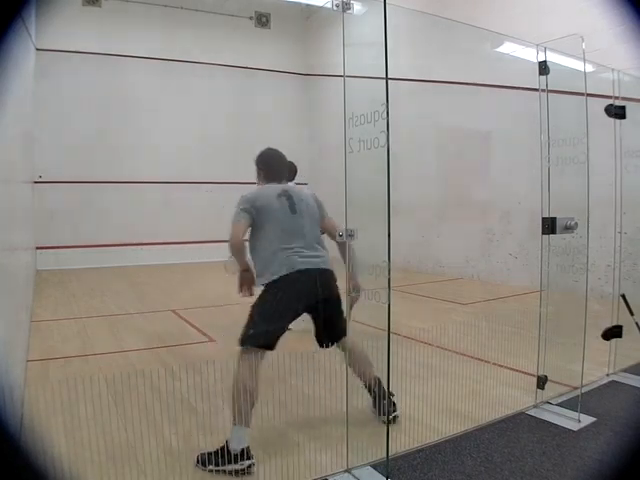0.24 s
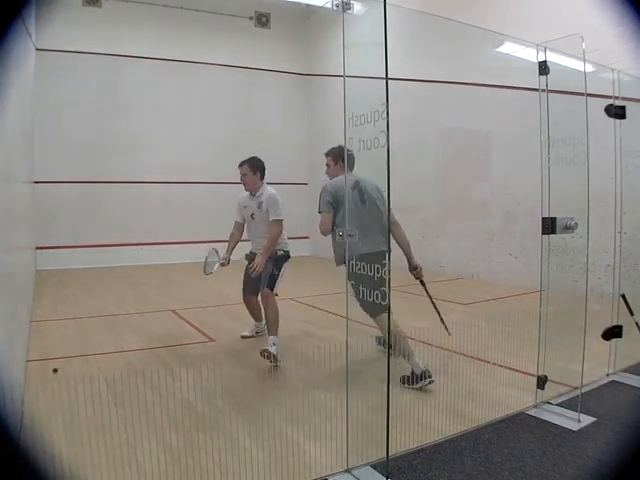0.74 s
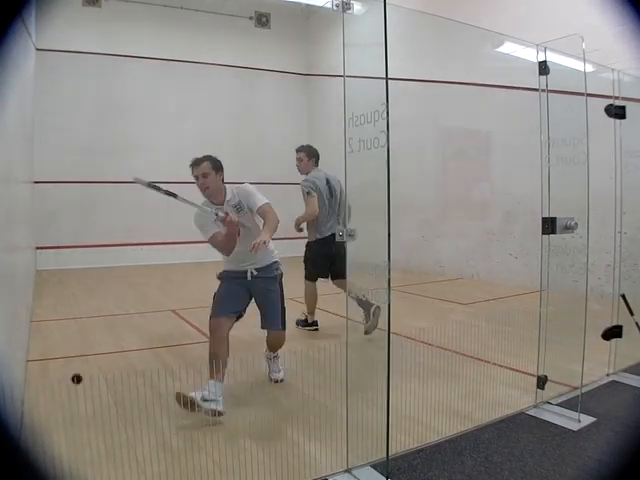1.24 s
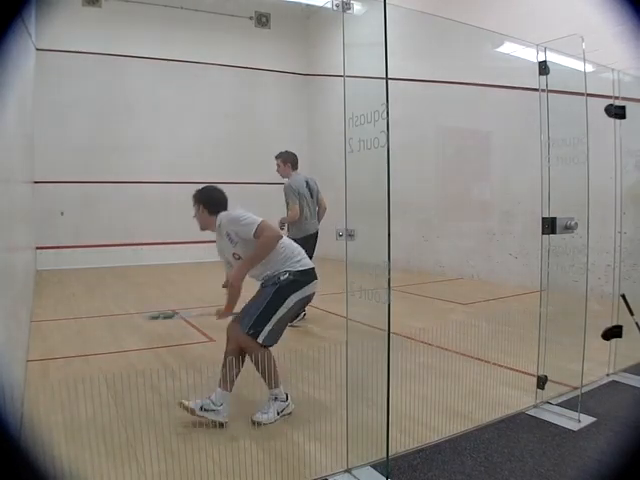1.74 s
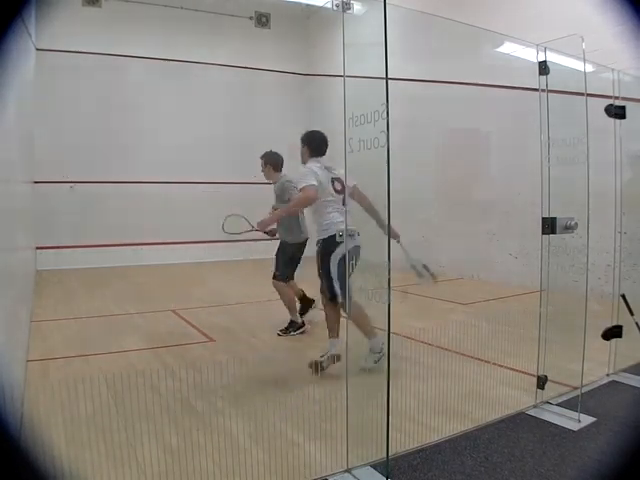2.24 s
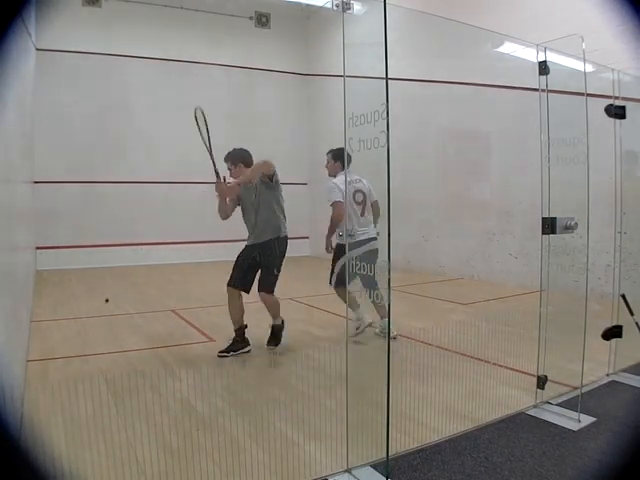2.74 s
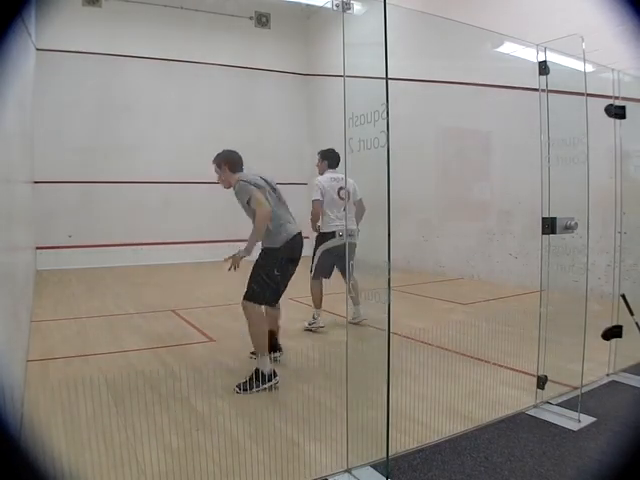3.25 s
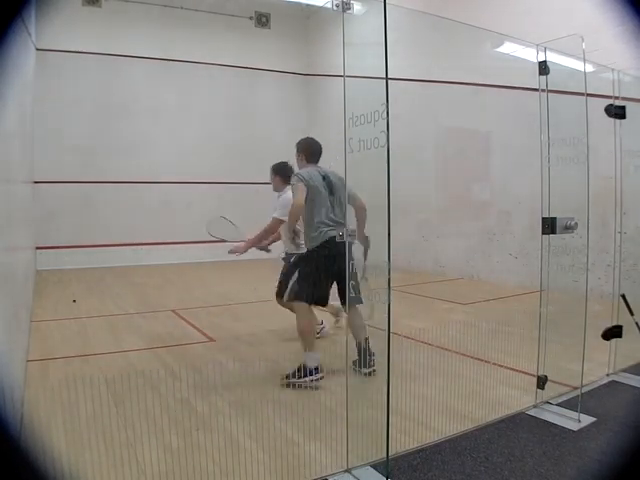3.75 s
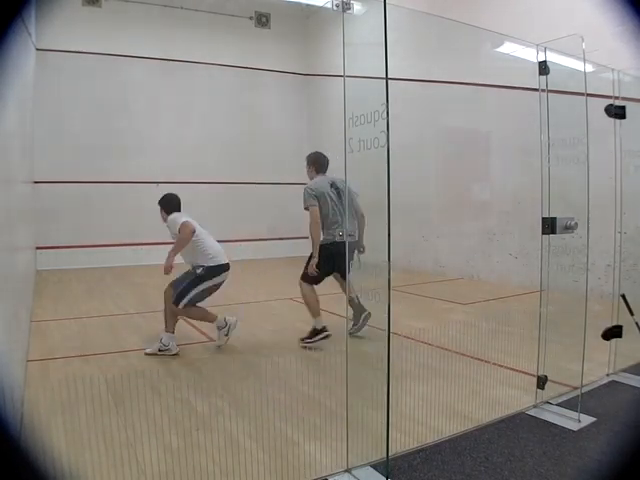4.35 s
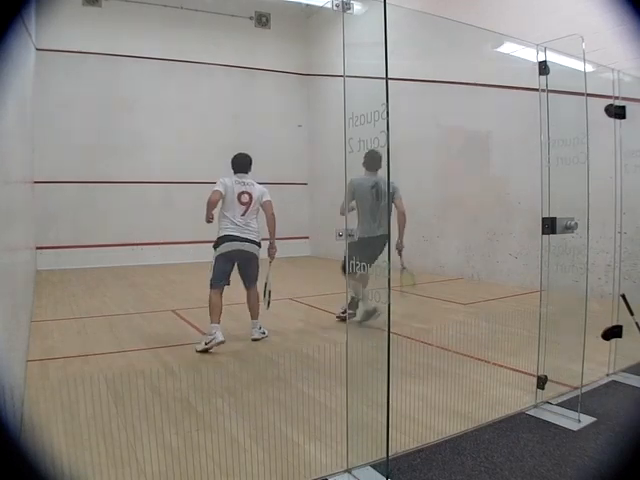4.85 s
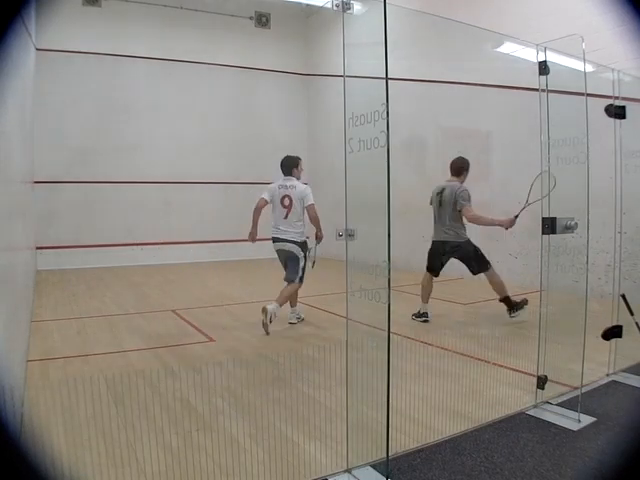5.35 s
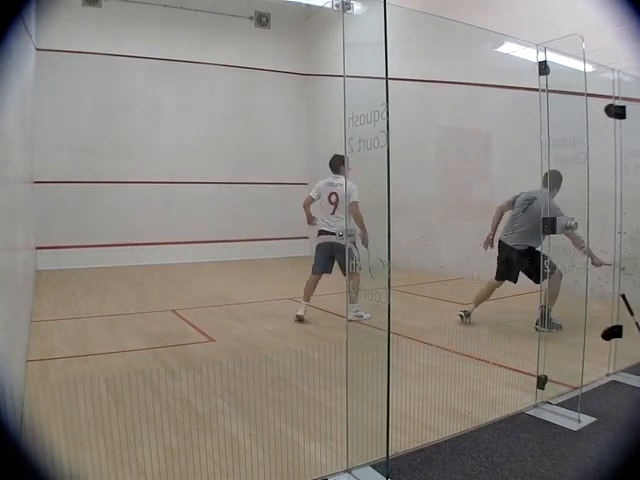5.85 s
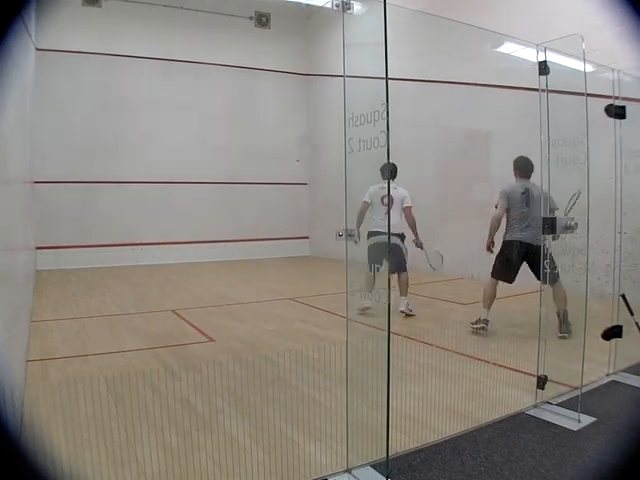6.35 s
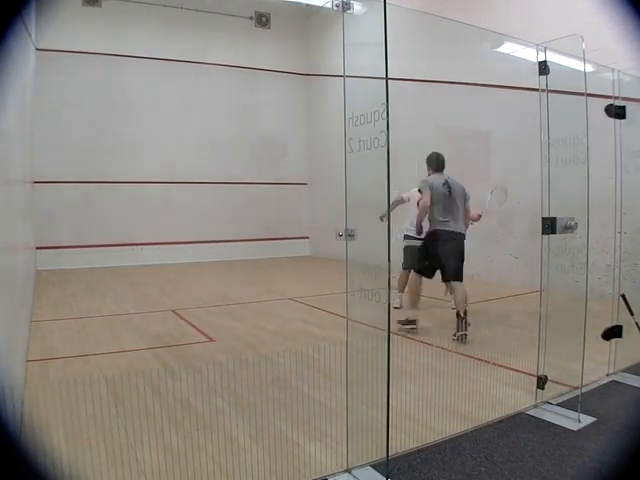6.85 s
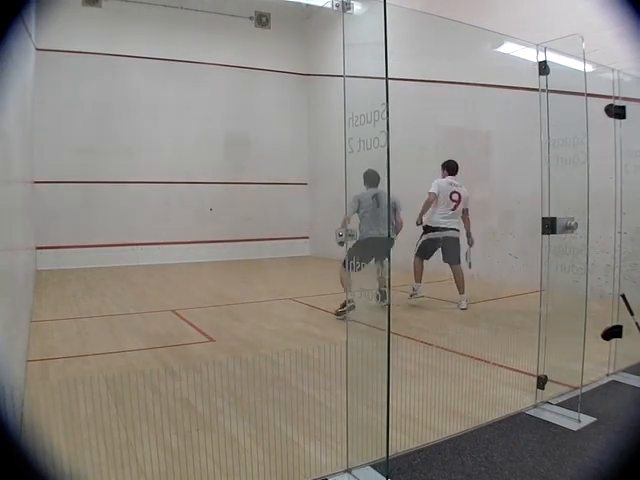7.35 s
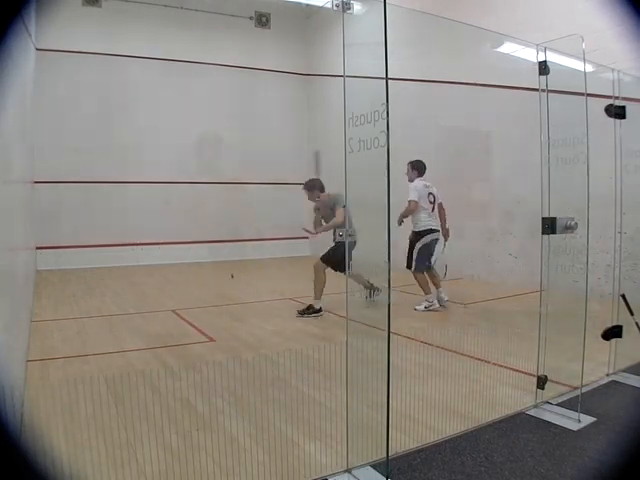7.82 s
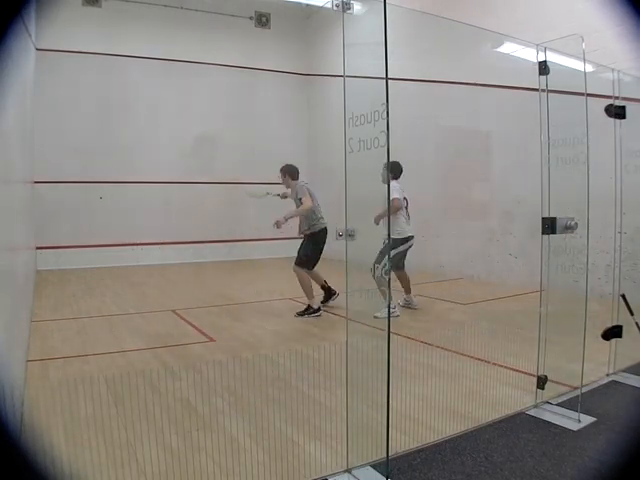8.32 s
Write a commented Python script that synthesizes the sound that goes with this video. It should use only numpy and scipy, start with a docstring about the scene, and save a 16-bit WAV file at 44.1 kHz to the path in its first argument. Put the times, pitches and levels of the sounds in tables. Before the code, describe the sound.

A squash rally in a hard, very reverberant court, heard in wide stereo from behind glass. Two quick, hollow rubber smacks open it, another follows at 0.2 seconds, and a short sole squeak chirps over them. Low foot thuds shake the boards around 0.6. At 1.3 the glass rattles briefly close by; squeaks come near 1.6, with light ball taps, then a crisp double hit at 1.95. After a gap of footfalls, strong smacks and a piercing squeak cluster at 3.2-3.4. Heavy steps and squeaks lead to hits from 4.3 to 4.5. Echo dies away until softer blows at 5.9 and a loud one at 6.2. More hits sound at 7.1-7.35, bright squeaks around 7.5, and final smacks at 8.1 and 8.3, ringing to the end. Low ventilation rumble, faint hiss and a very thin high whine persist throughout.

```python
"""A hollow rubber ball smacks rackets and walls in a hard squash court, heard from behind the glass:
each blow is a click that sets damped rings going. Soles squeak as gliding, wobbling tones, feet pound
the sprung floor as low board modes, and once the glass rattles close by as a short burst of noise.
Ball and squeaks trail a long echo of dying noise; ventilation is steady coloured noise.
A widened stereo microphone listens through a gain control, with faint hiss and a thin whine."""
import sys
import numpy as np
from scipy import signal
from scipy.fft import rfft, irfft, next_fast_len
from scipy.io import wavfile
from scipy.ndimage import uniform_filter1d

SR = 44100
rng = np.random.default_rng(int(sys.argv[2]) if len(sys.argv) > 2 else 0)


def wav_out(sig):
    """Save sig, one row per channel (or a flat mono array), as 16-bit PCM at SR to the path in sys.argv[1]."""
    wavfile.write(sys.argv[1], SR, np.round(np.clip(np.atleast_2d(sig).T, -1, 1) * 32767).astype(np.int16))


N = 378378
SPOTS = 4  # places in the court, taken in turn


def amp(db):
    """dB to gain."""
    return 10 ** (np.asarray(db) / 20)


def unit(x):
    """Scale to energy 1."""
    return x / np.sqrt(np.sum(x ** 2))


def at_hz(points, hz):
    """Read a (Hz, value) table on a log-frequency axis."""
    table_hz, values = np.transpose(points)
    return np.interp(np.log(hz + 1), np.log(table_hz), values)


def colour(x, points):
    """Weight the spectrum of a signal by a (Hz, dB) table."""
    size = next_fast_len(x.shape[-1])
    gain = amp(at_hz(points, np.fft.rfftfreq(size, 1 / SR)))
    return irfft(rfft(x, size) * gain, size)[..., :x.shape[-1]]


def filtered(x, order, hz, kind):
    """Butterworth filter, "high" or "low" pass."""
    return signal.sosfilt(signal.butter(order, hz, kind, fs=SR, output="sos"), x)


def decay(count, t60_s):
    """Gain that falls by 60 dB in t60_s."""
    return amp(-60 * np.arange(count) / SR / t60_s)


def ring(hz, width_hz, count):
    """One damped mode under a soft contact: it swells, then dies; energy 1."""
    t = np.arange(count) / SR
    return unit(np.sin(2 * np.pi * hz * t) * t * np.exp(-2 * np.pi * width_hz * t))


def add(track, start_s, sound):
    """Mix a sound into a track at its start time."""
    i = round(start_s * SR)
    track[i:i + len(sound)] += sound[:N - i]


def smeared(sound, smear_s, delays):
    """Every narrow band arrives late by its own share of smear_s; the colour stays."""
    late_s = smear_s * np.repeat(delays, 16)
    size = 2 * len(late_s)
    # a delay is the slope of phase over frequency
    turn = np.exp(-2j * np.pi * np.cumsum(np.append(0, late_s)) * SR / size)
    return irfft(rfft(sound, size) * turn, size)


# Blows of the ball: start_s, level_db, smear_s (longest delay from nearby walls), wall_ring_db, crack_db
# (relative to the level); a row 11 ms after another (0.011, 1.96, 7.35) is that blow's strong late echo
BALL_BLOWS = [(0, -25, 0.00087, 2, -5), (.011, -16.5, 0.0012, 3.5, -0.5), (.189, -23, 0.00096, 3.5, -5),
              (1.285, -33, 0.00088, -2, -15.5), (1.625, -33, .006, 3.5, -14),
              (1.675, -30.5, 0.0053, 2.5, -52), (1.949, -22, .001, -3, -3),
              (1.96, -17.5, 0.0039, -1.5, -4.5), (3.172, -25.5, 0.0012, 9, 2), (3.226, -16, 0.018, -7, -8),
              (3.362, -18.5, .039, 11, 2.5), (4.279, -18.5, 0.0031, -2.5, -13),
              (4.32, -19.5, 0.019, -1.5, -10), (4.5, -18, 0.019, -3, -3), (5.911, -30, 0.00195, 3, -0.5),
              (5.955, -25, .029, -11.5, -7.5), (6.217, -16, 0.0011, -1.5, -4.5),
              (7.112, -31.5, 0.0015, 3, 1), (7.149, -26, .006, 2.5, -2), (7.338, -23, 0.0019, 3, 0.5),
              (7.35, -19, 0.0021, 0, -4), (8.105, -27, 0.00299, 1, -4), (8.138, -21.5, .015, -4, -5.5),
              (8.313, -16, .012, 0.5, -1.5)]
# Rings of ball, strings and wall: pitch_hz, width_hz, level_db, wall_share (dB per dB of wall ring)
BALL_RINGS = [(270, 94, 0.5, 0.31), (765.6, 129, 1, 0.89), (1154, 326, -8.5, 1.67), (1229, 181, -0.5, 0),
              (1855, 497, -2.5, 0.94), (3577, 520, -15, 0.077)]
# The lowest ring is a pair: the shell, and the table's body tone at BODY_DB against it
SHELL_HZ, SHELL_WIDTH_HZ, BODY_DB = 375.4, 125, -6.5
CRACK_HZ = 4860  # the crack is a click above this
# A weakly ringing wall hollows out one band: share removed per dB of wall ring below 0
HOLLOW_HZ, HOLLOW_WIDTH_HZ, HOLLOW_PER_DB = 1484, 710, 0.03


def ball():
    """A click sets every ring going, neighbours in opposite sign; nearby walls smear far blows."""
    hz, width_hz, ring_db, wall_share = np.transpose(BALL_RINGS)
    rings = np.array([ring(hz[k], width_hz[k], count=1024) * (-1) ** k for k in range(len(hz))])
    shell = ring(SHELL_HZ, SHELL_WIDTH_HZ, count=1024)
    rings[0] = unit(rings[0] * amp(BODY_DB) + shell)
    click = np.eye(1, 1024)[0]
    crack = unit(filtered(click, 2, CRACK_HZ, "high"))
    hollow_band = signal.iirpeak(HOLLOW_HZ, HOLLOW_HZ / HOLLOW_WIDTH_HZ, SR)
    delays = rng.random(size=(len(BALL_BLOWS), 512))
    spots = np.zeros((SPOTS, N))
    for k, (start_s, level_db, smear_s, wall_db, crack_db) in enumerate(BALL_BLOWS):
        blow = amp(ring_db + wall_share * wall_db) @ rings + amp(crack_db) * crack
        removed = np.clip(-HOLLOW_PER_DB * wall_db, 0, 1)
        blow = blow - removed * signal.lfilter(*hollow_band, blow)
        add(spots[k % SPOTS], start_s, amp(level_db) * smeared(blow, smear_s, delays[k]))
    return spots


# Stereo width heard at the microphone: band_hz, side_minus_mid_db
STEREO_WIDTH = [(60, -27.5), (140, -18.5), (330, -13), (770, -4), (1790, 7), (3400, 10), (8000, 8.5),
                (15000, 2.5)]


def widened(side):
    """Weight side noise to the stereo width of each band."""
    return colour(side, STEREO_WIDTH)


GRAIN_DB, GRAIN_S = 4, 0.11  # unevenness of the early reflections, and its fading time


def reflections(count):
    """Mid and side noise of many arrivals; the early ones are uneven, in lumps of 2 ms."""
    t = np.arange(count) / SR
    lumps = np.repeat(rng.standard_normal(count // 88 + 1), 88)[:count]
    grain = amp(GRAIN_DB * lumps * np.exp(-t / GRAIN_S))
    mid, side = rng.standard_normal((2, count)) * grain
    return np.array([mid, widened(side)])


# Echo of the hard-walled court: band_hz, t60_s
COURT_ECHO = [(100, 1.1), (200, 1.47), (400, 2.67), (800, 2.54), (1600, 2.45), (3200, 2.53), (6000, 1.8),
              (10000, 1.29), (16000, 2.3)]
DIRECT_DB = 18   # first arrival, against the reflections
FILL_S = 0.00043  # time in which the reflections fill in


def echo(count):
    """Mid and side echo from one spot: the first arrival, then reflections dying band by band."""
    t, hz = np.arange(count) / SR, np.fft.rfftfreq(count, 1 / SR)
    arrivals = reflections(count) * (1 - np.exp(-t / FILL_S))
    arrivals[:, 0] = amp(DIRECT_DB)  # equal in mid and side, so almost wholly on the left
    spectrum, out = rfft(arrivals), 0
    for k, (_, t60_s) in enumerate(COURT_ECHO):
        # a band counts fully at its own frequency and fades out towards its neighbours
        share = at_hz([(band_hz, j == k) for j, (band_hz, _) in enumerate(COURT_ECHO)], hz)
        out = out + irfft(spectrum * share, count) * decay(count, t60_s)
    return out


# Ventilation in the hall: band_hz, level_db (per Hz, relative)
VENTILATION = [(15, -35), (25, -1.5), (110, -8), (604, -17.5), (1220, -15.5), (1980, -24), (2810, -28.5),
               (3300, -33), (5980, -51), (15800, -38)]
AIR_DB = -31  # rms of its mid


def hall():
    """Steady ventilation noise, as wide as the echo."""
    mid, side = colour(rng.standard_normal((2, N)), VENTILATION)
    return amp(AIR_DB) * np.array([mid, widened(side)]) / mid.std()


# Soles slipping on varnish: start_s, length_s, from_hz, to_hz, level_db
SOLE_SQUEAKS = [(.09, 0.094, 3590, 3546, -23), (1.568, 0.032, 3300, 3775, -23.5),
                (1.61, 0.084, 3175, 3733, -19), (3.30, 0.041, 3877, 3737, -21.5),
                (3.335, 0.0603, 3832, 3534, -12.5), (4.1, 0.11, 3930, 4075, -24),
                (4.135, 0.034, 3580, 3546, -19), (4.478, 0.0255, 2974, 3180, -16.5),
                (4.51, 0.087, 3154, 3524, -22), (6.27, 0.052, 3760, 3640, -29.5),
                (6.52, 0.036, 3380, 3350, -33.5), (7.44, 0.094, 3385, 3120, -15),
                (7.54, 0.062, 3225, 3724, -19), (7.99, 0.079, 4630, 4455, -30.5),
                (8.44, 0.069, 5500, 5300, -34)]
# Lower squeaks grip harder and mostly wobble more: mean_hz, wobble_share (of the pitch)
SOLE_WOBBLE = [(3100, 0.071), (3400, 0.058), (3590, 0.02), (3750, 0.037), (4500, 0.011), (5400, 0.011)]
WOBBLES_PER_S, OVERTONE_DB = 900, -27
SCUFF_DB, SCUFF_HZ = -5.5, 6600  # sliding hiss: noise gain, and the pitch it lies above


def soles():
    """Stick-slip of rubber: a gliding, wobbling tone, weak overtone and hiss; it bites, then fades."""
    count = len(SOLE_SQUEAKS)
    wobbles = rng.standard_normal(size=(count, 200))
    scuff = amp(SCUFF_DB) * filtered(rng.standard_normal(size=(count, 8192)), 2, SCUFF_HZ, "high")
    spots = np.zeros((SPOTS, N))
    for k, (start_s, length_s, from_hz, to_hz, level_db) in enumerate(SOLE_SQUEAKS):
        u = np.linspace(0, 1, round(length_s * SR))  # progress through the squeak
        wobble = np.interp(u * length_s * WOBBLES_PER_S, np.arange(wobbles.shape[1]), wobbles[k])
        share = at_hz(SOLE_WOBBLE, (from_hz + to_hz) / 2)
        pitch_hz = (from_hz + (to_hz - from_hz) * u) * (1 + share * wobble)
        phase = 2 * np.pi * np.cumsum(pitch_hz) / SR
        tone = np.sin(phase) + amp(OVERTONE_DB) * np.sin(2 * phase) + scuff[k, :len(u)]
        bite = np.sin(np.pi * u ** .5) ** .5
        add(spots[k % SPOTS], start_s, amp(level_db) * unit(tone * bite))
    return spots


# Feet landing: start_s, level_db (relative; the boom's length raises all alike)
FOOT_STEPS = [(.329, -31.5), (.632, -10.5), (.722, -17.5), (1.009, -32), (1.285, -15.5), (1.4, -21.5),
              (1.591, -24.5), (1.93, -30), (2.381, -42), (2.49, -28.5), (2.7, -26), (2.968, -20),
              (3.04, -24.5), (3.199, -27), (3.709, -27), (4.07, -13), (4.14, -12.5), (4.24, -21),
              (4.378, -17), (4.906, -28), (5.02, -28), (5.6, -28), (6.045, -29), (6.179, -22.5),
              (6.852, -31), (7.069, -26.5), (7.49, -21), (7.57, -26), (7.818, -22.5), (8.009, -31)]
# Boards of the sprung floor: pitch_hz, width_hz, level_db (before each landing's own strengths)
FLOOR_BOARDS = [(31.8, 26, -2), (58.1, 26, -1), (81, 17.5, 0.5), (128, 51.4, -3.5)]
BOOM_T60_S = 1.0  # how long the floor and the air under it boom
THUD_DB = -9.5    # first thud of the heel, against the boom


def feet():
    """Each landing drives the floor boards with strengths of its own: a thud and an uneven boom."""
    boards = np.array([amp(db) * ring(hz, width, count=8192) for hz, width, db in FLOOR_BOARDS])
    strengths = amp(1.8 * rng.standard_normal((len(FOOT_STEPS), len(FLOOR_BOARDS))))
    dying = decay(40000, BOOM_T60_S)
    mid_side = np.zeros((2, N))
    for k, (start_s, level_db) in enumerate(FOOT_STEPS):
        thud = unit(strengths[k] @ boards)
        for track, noise in zip(mid_side, rng.standard_normal((2, len(dying)))):
            boom = unit(signal.fftconvolve(thud, noise * dying))
            add(boom, 0, -amp(THUD_DB) * thud)
            add(track, start_s, amp(level_db) * np.linalg.norm(dying) * boom)
    mid, side = mid_side
    return np.array([mid, widened(side)])


# The ball knocks on the glass close by, one row: start_s, level_db (before the low-pass), t60_s, top_hz
GLASS_KNOCK = (1.282, -12, .11, 1800)


def glass():
    """The pane rattles briefly on the listener's side, outside the long echo."""
    start_s, level_db, t60_s, top_hz = GLASS_KNOCK
    rattle = reflections(count=16384) * amp(level_db) * decay(16384, t60_s)
    mid_side = np.zeros((2, N))
    for track, part in zip(mid_side, filtered(rattle, 1, top_hz, "low")):
        add(track, start_s, part)
    return mid_side


LAG = -1  # share of the slope of mid that leaks into side: right is earlier


def scene():
    """Ball and soles sound from four spots, each with its own echo; mid and side become left and right."""
    spots = ball() + soles()
    court = 0
    for spot in spots:
        court = court + signal.fftconvolve(spot[None], echo(count=110592), axes=1)[:, :N]
    mid, side = court + feet() + glass() + hall()
    side = side + LAG * np.gradient(mid)
    return np.array([mid + side, mid - side])


# Microphone behind the glass: band_hz, gain_db
MIC_COLOUR = [(20, -2.5), (4000, -6.5), (4800, -11), (6000, -21), (8000, -27), (10000, -17), (12500, -25),
              (16000, -29)]
# The two capsules differ: band_hz, left_minus_right_db
CAPSULE_TILT = [(60, 1), (130, -0.5), (290, 0.5), (640, 0.5), (1410, -1.5), (3100, -1.0), (6820, -0.5),
                (15000, -1.5)]
# Narrow gaps in the response: center_hz, width_hz
MIC_NOTCHES = [(2860, 500), (2860, 120), (5000, 300)]
LOW_CUT_HZ, CUTOFF_HZ = 27, 15800
KNEE_DB, RELEASE_DB_S = -11, 64  # gain control: held level, speed of letting go
TOP = 1.3  # soft ceiling of the amplitude
HISS_DB = -59
LINE_HZ, LINE_DB = 15734, -71  # thin whine


def record(dry):
    """Microphone colour, gain control that holds loud blows down, hiss, notches, a thin whine, top cut."""
    left, right = filtered(colour(dry, MIC_COLOUR), 2, LOW_CUT_HZ, "high")
    x = np.array([colour(left, CAPSULE_TILT), right])
    power = uniform_filter1d(np.mean(x ** 2, axis=0), size=441)  # 10 ms
    level_db = 10 * np.log10(power + 1e-12)
    # peaks are held, then let go at a steady rate
    ramp = RELEASE_DB_S * np.arange(N) / SR
    held_db = np.maximum.accumulate(level_db + ramp) - ramp
    x = x * amp(-uniform_filter1d(np.maximum(held_db - KNEE_DB, 0), size=221))
    x = TOP * np.tanh(x / TOP)
    x = x + amp(HISS_DB) * rng.standard_normal(x.shape)
    for hz, width_hz in MIC_NOTCHES:
        x = signal.lfilter(*signal.iirnotch(hz, hz / width_hz, SR), x)
    x = x + amp(LINE_DB) * np.sin(2 * np.pi * LINE_HZ * np.arange(N) / SR)
    return signal.sosfilt(signal.ellip(14, .5, 50, CUTOFF_HZ, fs=SR, output="sos"), x)


dry = scene()
out = record(dry)
wav_out(out)
```